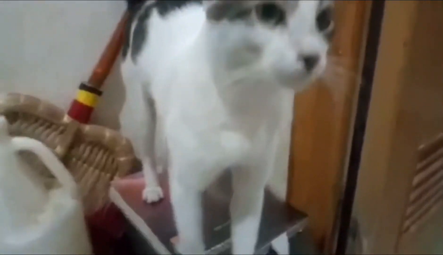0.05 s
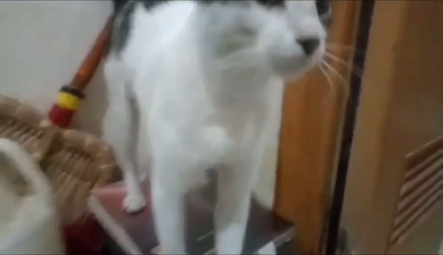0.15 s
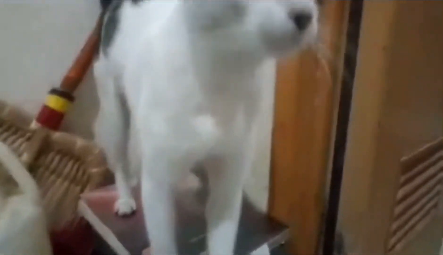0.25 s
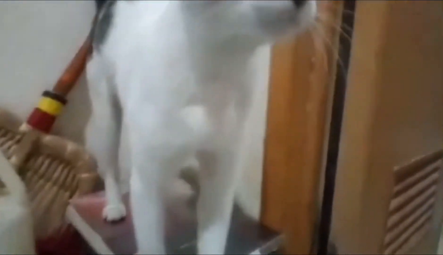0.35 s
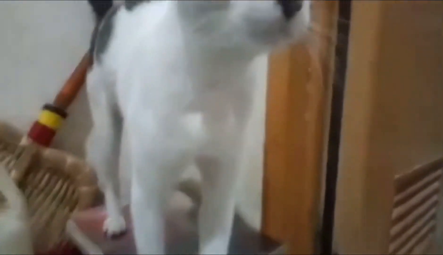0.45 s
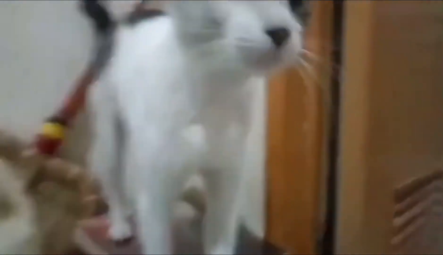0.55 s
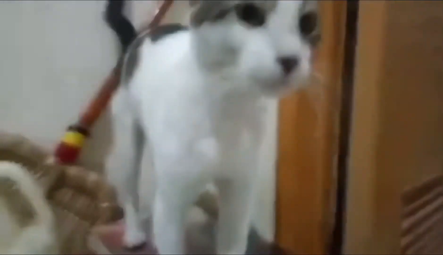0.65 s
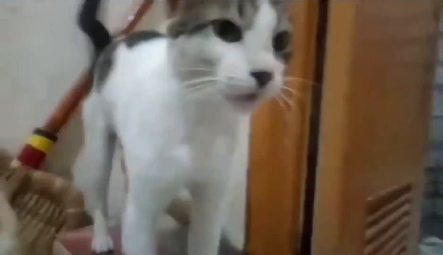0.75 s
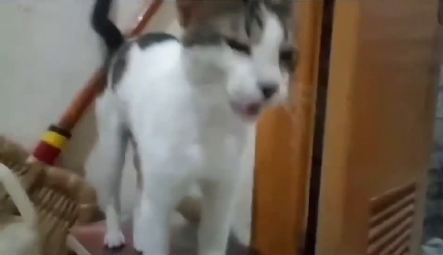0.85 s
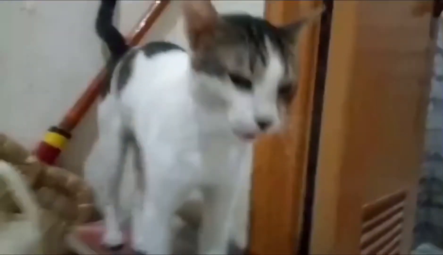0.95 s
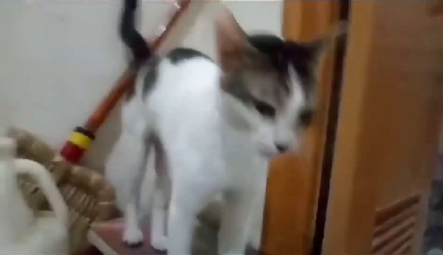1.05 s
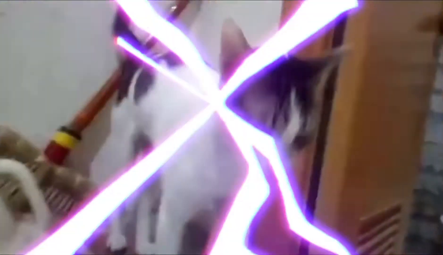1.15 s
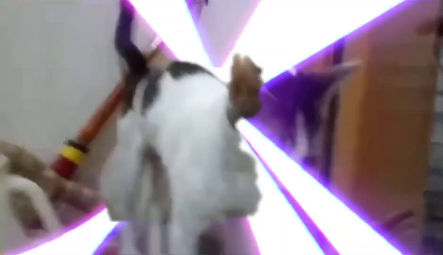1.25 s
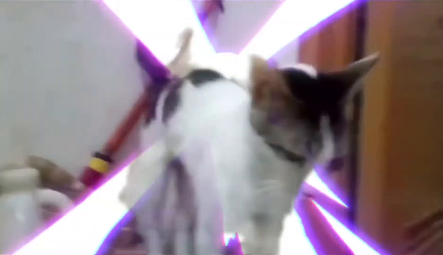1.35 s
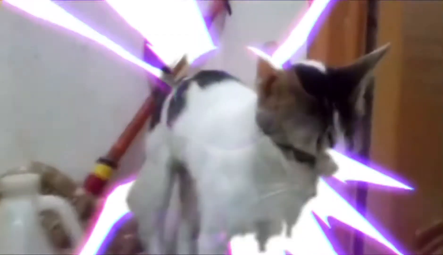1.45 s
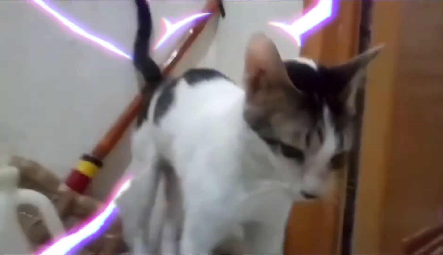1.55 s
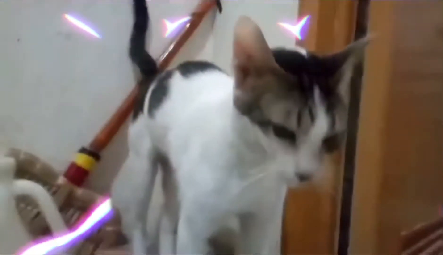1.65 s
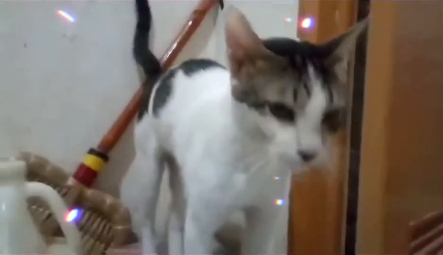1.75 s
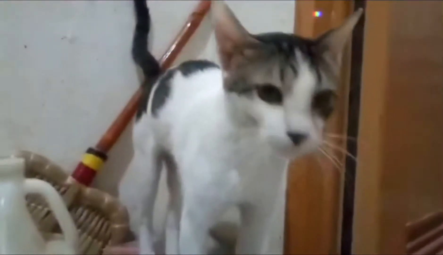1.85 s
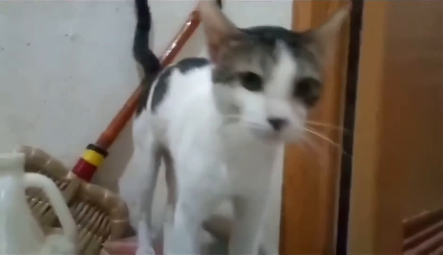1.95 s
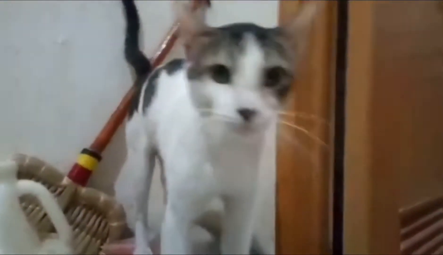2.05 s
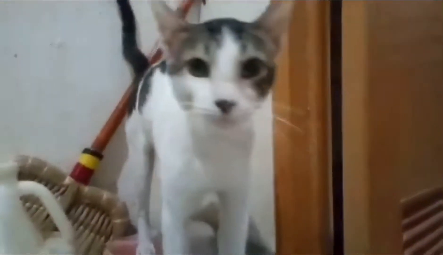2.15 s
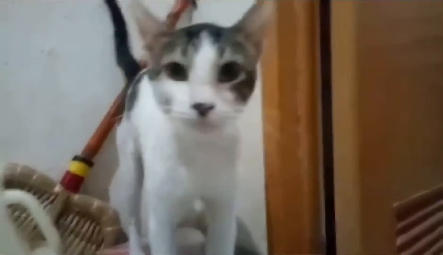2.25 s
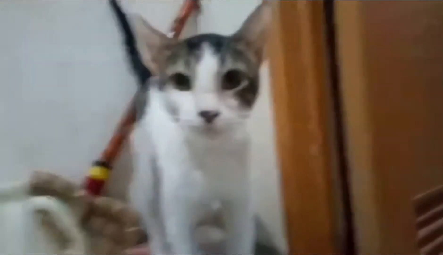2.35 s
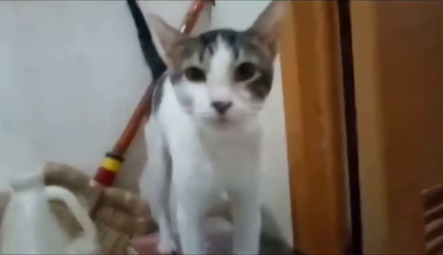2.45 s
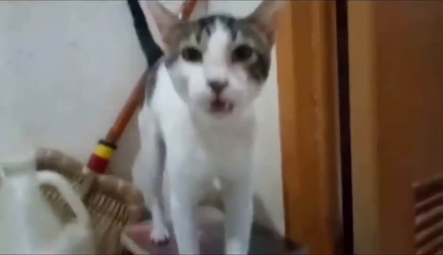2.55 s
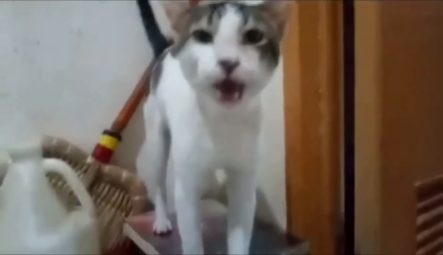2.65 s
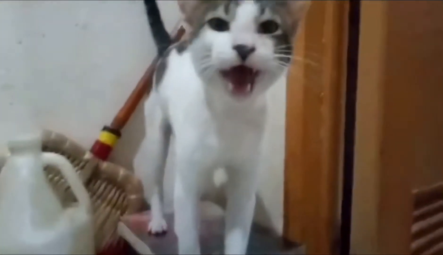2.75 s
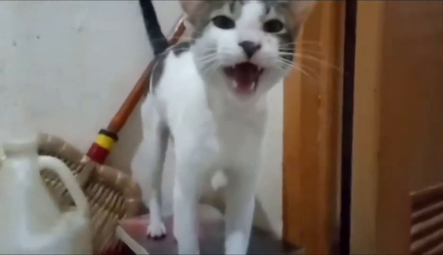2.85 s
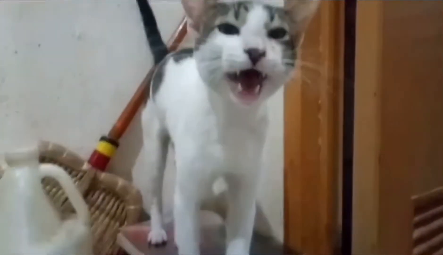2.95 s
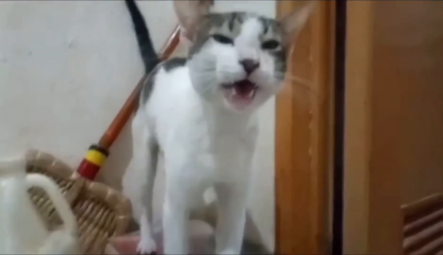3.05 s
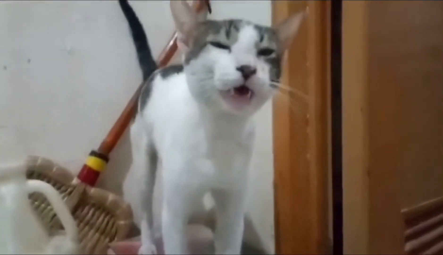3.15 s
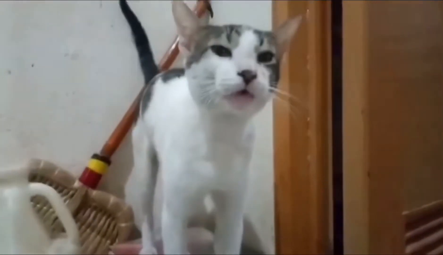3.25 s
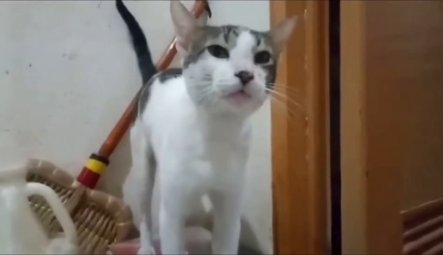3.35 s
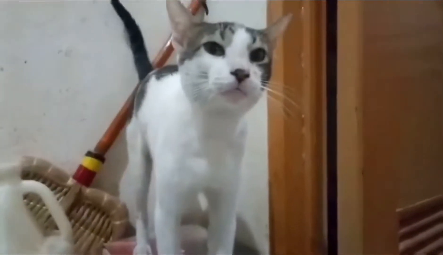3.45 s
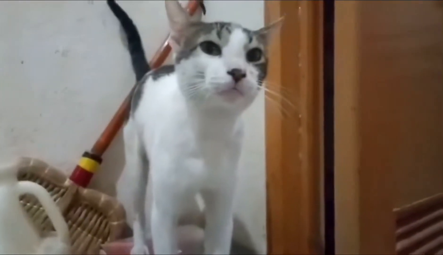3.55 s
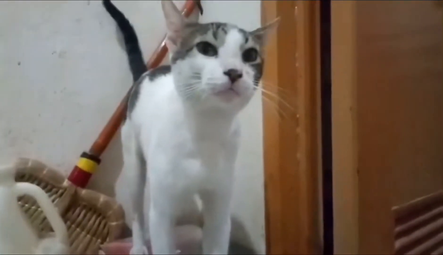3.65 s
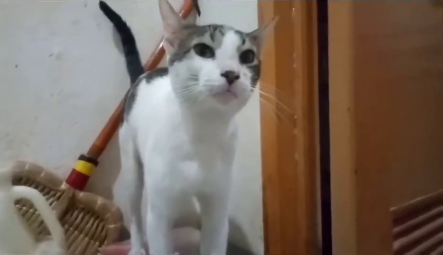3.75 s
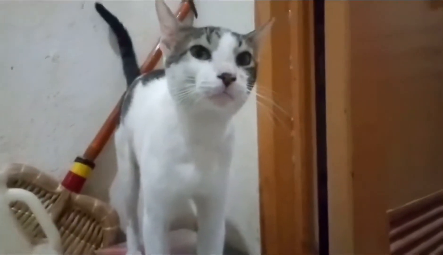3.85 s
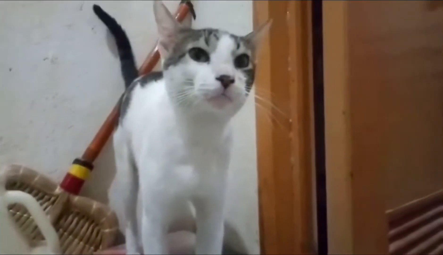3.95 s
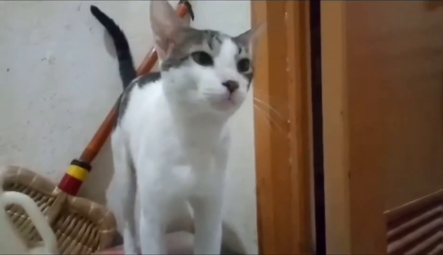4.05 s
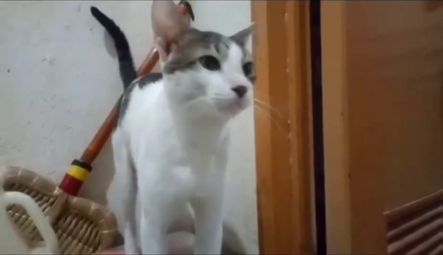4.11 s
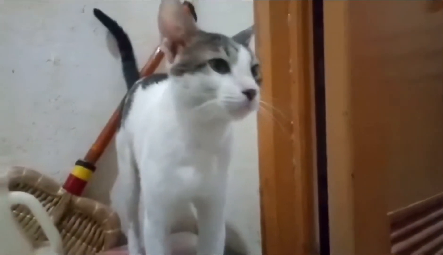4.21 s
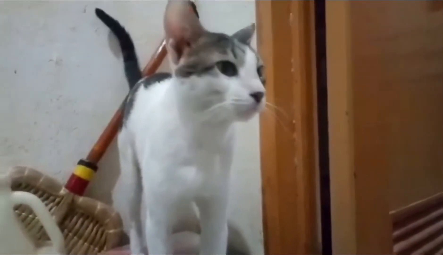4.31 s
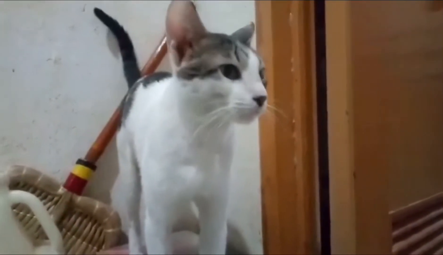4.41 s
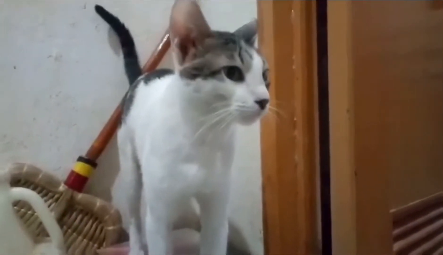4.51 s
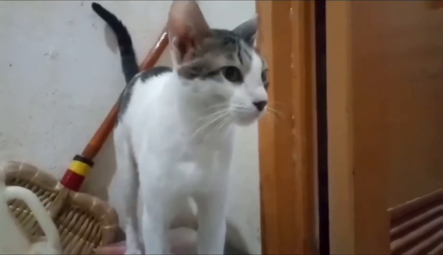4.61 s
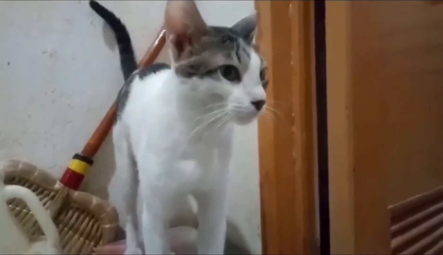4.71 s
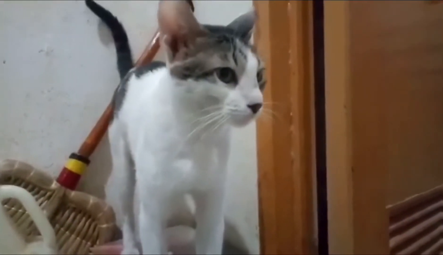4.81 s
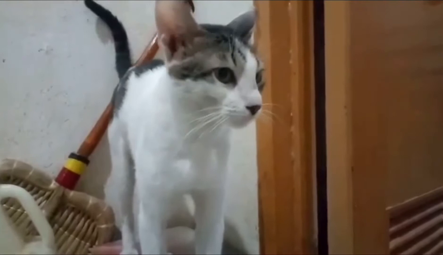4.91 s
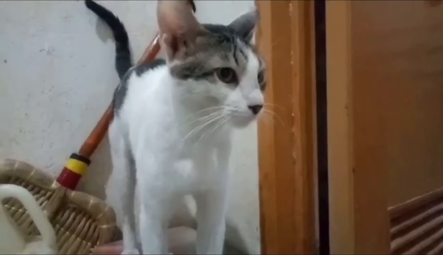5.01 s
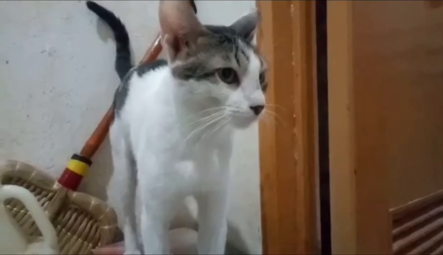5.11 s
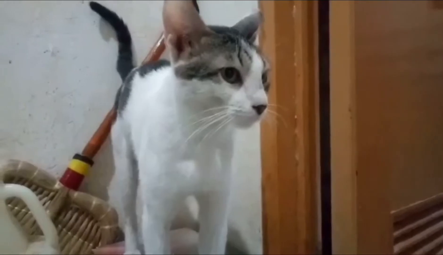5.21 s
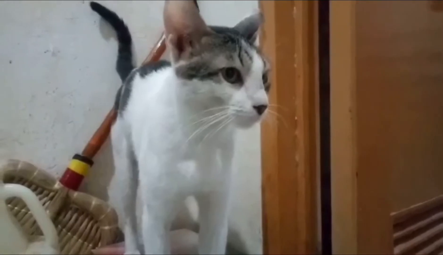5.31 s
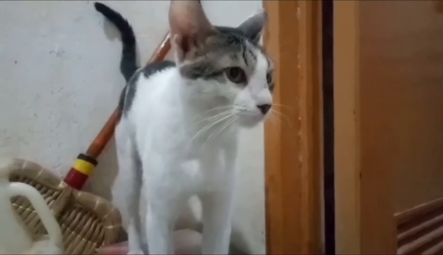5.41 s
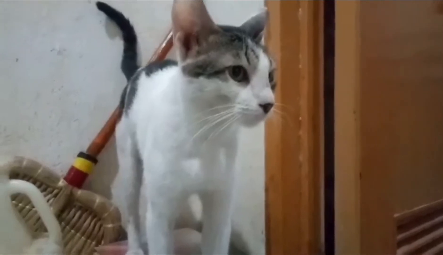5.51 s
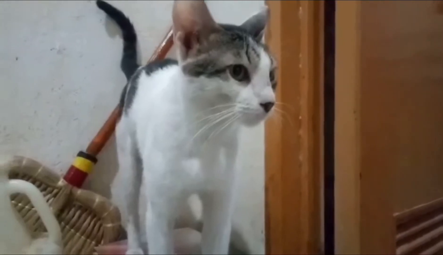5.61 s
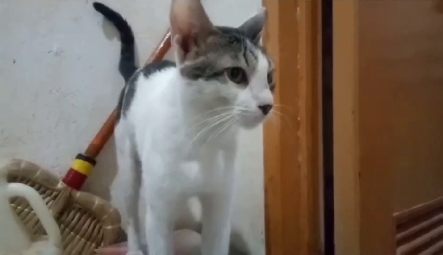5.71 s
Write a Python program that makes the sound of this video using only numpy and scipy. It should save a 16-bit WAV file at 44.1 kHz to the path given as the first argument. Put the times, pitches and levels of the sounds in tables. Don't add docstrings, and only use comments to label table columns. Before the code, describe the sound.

Faint air noise, fridge hum and a wavering low rumble open the scene. A nearby cat gives a brief trilled meow with a breathy end, pauses, then a longer, stronger one. Bristly scrapes with hollow knocking resonance follow from next door, in two clusters. Phone pickup, short dense indoor echo, left side louder.

```python
import sys
import numpy as np
from scipy import signal
from scipy.fft import rfft, irfft
from scipy.io import wavfile
from scipy.ndimage import uniform_filter1d, minimum_filter1d

SR = 44100
rng = np.random.default_rng(int(sys.argv[2]) if len(sys.argv) > 2 else 0)


def generate_wav(signal):
    frames = np.transpose(np.atleast_2d(signal))
    scaled = np.clip(frames, -1, 1) * 32767
    pcm = np.round(scaled).astype(np.int16)
    wavfile.write(sys.argv[1], SR, pcm)


def invert_db(x):
    u = np.asarray(x, float) / 20
    return 10 ** u


N = 254436
T = np.arange(N) / SR
HZ = np.fft.rfftfreq(N, 1 / SR)


def meow(cry, hoarse):
    trill_crests = [
        .522,
        0.714,
        0.953,
        1.239,
        2.322,
        2.611,
        2.847,
        3.097,
        3.2,
        3.393,
    ]
    beat_counts = [6, 5, 8, 30, 8, 4, 6, 3, 4]
    # jaw opening/0-1, nose level/dB, throat level/dB, mouth level/dB, palate level/dB
    jaw_levels = [(0, 1.5, -16.5, -19, -32.5), (.33, -9.5, 3, -20, -16), (.52, -22.5, -5, -8, -5),
                  (.7, -36, -13, -3, -4.5), (1, -29.5, -17.5, -10, 0)]
    jaw_shapes = [(0, 780, 8.2, 0.5, .55), (.33, 1152, 6.9, -26, 0.39), (.52, 1280, 6.43, -15.5, 0.14),
                  (.7, 1070, 6.97, -20, 0.01), (1, 1103, 6.754, 1.5, .001)]
    # f/Hz, width/Hz, level under the palate/dB
    sinus_rings = [(5200, 900, -22), (6000, 500, -25), (7400, 900, -31), (9800, 1500, -41),
                   (12000, 1500, -54)]
    nose_hz, nose_width_hz, throat_width_hz = 468, 320, 420
    mouth_order, mouth_width_hz = 4.0, 284
    palate_width_hz, palate_roof_hz = 520, 4250
    palate_drop_per_trill = 0.95
    cheek_hz, cheek_width_hz = 2930, 260
    breath_db, breath_hz, breath_width_hz = -2, 4400, 2100
    head_turn_db, right_lead_s = -2.5, .000045

    start_s, end_s = cry[0][0], cry[-1][0]
    on = (T > start_s) & (T < end_s)
    hz, effort_db, jaw, depth = columns_at(cry, T[on])
    nose, throat, mouth, palate = (invert_db(effort_db + db) for db in columns_at(jaw_levels, jaw))
    throat_hz, palate_partial, cheek_db, rough = columns_at(jaw_shapes, jaw)
    palate_hz = (palate_partial - palate_drop_per_trill * depth) * hz
    rough = np.clip(rough + hoarse * depth * np.linspace(0, 1, len(jaw)) ** 2, 0, 1)
    trill = np.cos(2 * np.pi * np.interp(T[on], trill_crests, np.cumsum([0, *beat_counts])))

    hz = uniform_filter1d(hz, size=2600)
    arch = .015 + .13 * np.clip((505 - hz) / 50, 0, 1)
    hz = hz * (1 + arch * depth * trill + 0.048 * rough * walk(160)[on] + 0.001908 * walk(30)[on])
    phase = 2 * np.pi * np.cumsum(hz) / SR
    smooth_hz = uniform_filter1d(hz, size=400)
    palate_db = 20 * np.log10(palate)

    out = np.zeros((2, N))
    for k in range(1, 25):
        f = k * smooth_hz
        gain = nose * bell(f, nose_hz, nose_width_hz)
        gain += throat * bell(f, throat_hz, throat_width_hz)
        gain += mouth * bell(f, mouth_order * smooth_hz, mouth_width_hz)
        roof = bell(np.maximum(f, palate_roof_hz), palate_roof_hz, 1000)
        gain += palate * bell(f, palate_hz, palate_width_hz) * roof
        gain += sum(invert_db(0.8 * palate_db - 3.5 + db) * bell(f, c, w) for c, w, db in sinus_rings)
        gain += mouth * invert_db(cheek_db) * bell(f, cheek_hz, cheek_width_hz)
        gain *= invert_db(1.5 * walk(18)[on])
        share = np.clip(rough * (.5 + 0.12 * k), 0, 1)
        breath_band = (walk(350)[on] + 1j * walk(350)[on]) * (0.9 + 1.04 * share)
        fray = np.sqrt(1 - share) + np.sqrt(share / 2) * breath_band
        line = gain * fray * np.exp(1j * (k * phase + k * k * 0.4 - 1.6))
        turn = invert_db(head_turn_db * np.clip(1.2 + f / 5000, 0, 1) / 2)
        out[0, on] += turn * line.imag
        out[1, on] += (line * np.exp(2j * np.pi * f * right_lead_s)).imag / turn
    leak = diffuse(bell(HZ, breath_hz, breath_width_hz) ** 2)[:, on]
    out[:, on] += leak * palate * invert_db(breath_db) * rough
    out[:, on] *= (1 + np.clip(depth, 0, 1) * trill) / np.sqrt(1 + depth ** 2 / 2)
    fade = np.clip(np.minimum(T - start_s, end_s - T) / 0.0031, 0, 1)
    return 1.07 * out * fade


def rasp():
    # peak t/s, level/dB, rise/(dB/s), fall/(dB/s)
    puffs = [
        (1.312, -28, 20, 74.5),
        (3.268, -32.5, 94.5, 87),
        (3.422, -36.5, 93, 397),
    ]
    # f/Hz, level/dB per Hz
    air_colour = [(120, -50.5), (200, -3), (369, 4), (622, 7), (679, -6.5), (741, 7.5), (2840, 4.5),
                  (4250, -1.5), (7050, -21), (7830, -28), (13000, -36)]
    colour = invert_db(over_hz(air_colour))
    thin_colour = colour * bell(HZ, 3310, 5100) * (1 - bell(HZ, 0, 2200))
    airs = (diffuse(colour), diffuse(thin_colour))
    nose = diffuse(bell(HZ, 6600, 3200) ** 2 + 0.029 * (HZ > 9000))
    nose = nose * invert_db(3.4 * walk(70)) * swell(*puffs[-1])
    flutter = 1.6 * invert_db(0.77 * walk(60))
    hoarse_air = 0
    for air, puff in zip(airs, puffs):
        onset = np.clip((T - puff[0] + 0.17) / 0.08, 0, 1)
        hoarse_air = hoarse_air + air * swell(*puff) * onset
    return nose + flutter * hoarse_air


def walls(x):
    t60_s, echo_db = 0.17, -6.5
    t = T[:SR // 3]
    tail = rng.standard_normal((2, len(t))) * 1000 ** (-t / t60_s) * (t > .003)
    tail /= np.sqrt(np.sum(tail ** 2, axis=1, keepdims=True))
    return invert_db(echo_db) * signal.fftconvolve(x, tail, axes=1)[:, :N]


def scuffs():
    # peak t/s, rise/(dB/s), deep ring level/dB, high ring level/dB, bristle hiss level/dB
    rubs = [(3.447, 150, -32.5, -44.5, -48), (3.672, 155, -33.5, -37, -47.5), (3.848, 302, -23, -31, -40.5),
            (3.898, 200, -59, -35, -41.5), (4.066, 149, -35.5, -43, -60), (4.751, 166, -40, -43, -39.5),
            (4.813, 134, -37, -30.5, -37), (4.943, 900, -24, -27.5, -35), (5.172, 168, -50, -41.5, -33.5),
            (5.273, 600, -36, -43, -53), (5.35, 102, -44, -40.5, -49), (5.524, 156, -37.5, -33, -35),
            (5.716, 356, -34, -41.5, -43), (5.76, 115, -43, -40.5, -56)]
    # f/Hz, width/Hz, level/dB
    vessel_modes = [(321.6, 55, 2), (369, 18, -8), (443.3, 23, -0.5), (511.5, 17.5, -1), (558, 83, -5.5),
                    (670, 25, 1.5), (752, 37, -10.5), (802, 38, -1.5), (868.5, 26, -1.5), (1053, 23, -4.5)]
    # f/Hz, level/dB per Hz
    bristle_colour = [(880, -35), (1500, -10.5), (1980, 2), (2340, 2), (4240, 2), (4900, -4), (6030, -24.5),
                      (7100, -12.5), (13000, -76)]
    ring_fall, hiss_fall, middle_db = 154, 140, -1.5
    modes = sum(invert_db(db) * bell(HZ, f, w) for f, w, db in vessel_modes)
    grip = invert_db(0.92 * walk(40))
    deep_ring = 0.86 * diffuse(modes * (HZ < 555)) * grip
    high_ring = 0.86 * diffuse(modes * (HZ > 555)) * grip
    middle = 0.81 * diffuse(bell(HZ, 1260, 650)) * grip
    bristle = 1.01 * diffuse(invert_db(over_hz(bristle_colour)) * (HZ > 1500)) * invert_db(0.81 * walk(90))
    out = np.zeros((2, N))
    for s, rise, deep_db, high_db, hiss_db in rubs:
        out += swell(s, deep_db, rise, ring_fall) * deep_ring
        out += swell(s, high_db, rise, ring_fall) * high_ring
        out += swell(s, (high_db + hiss_db) / 2 + middle_db, rise, hiss_fall) * middle
        out += swell(s, hiss_db, rise, hiss_fall) * bristle
    return out


def room_tone():
    # f/Hz, level/dB per Hz
    air_colour = [(15, -43), (25, -15.5), (114, -1.5), (173, -11.5), (293, -10.5), (361, -5.5), (534, -17),
                  (641, -10), (878, -13), (1080, -15), (1300, -17.5), (2140, -18), (4330, -16),
                  (5930, -32.5), (13000, -47.5)]
    # f/Hz, width/Hz, level/dB
    fridge_lines = [(120.1, 2.5, -49), (359, 5.5, -56), (204, 43, -58.5)]
    # peak t/s, level/dB
    rumbles = [
        (.05, -46.5),
        (.21, -43.5),
        (.45, -51),
        (.68, -39),
        (2.06, -49),
        (2.4, -52),
        (3.92, -48),
        (4.92, -43.5),
        (5.43, -47),
        (5.77, -46),
    ]
    # start t/s, end t/s, first dip level/dB, last dip level/dB
    ducks = [
        (0.706, 1.153, -11, -10),
        (2.5, 3.205, -16.5, -18),
    ]
    rest_db, attack_s, release_s = 3.5, 0.1, 0.078
    hum_share, rumble_share = 1.26, .7
    air = diffuse(invert_db(over_hz(air_colour))) * invert_db(-46) * invert_db(walk(4.06) / 2)
    hum = sum(invert_db(db) * diffuse(bell(HZ, f, w)) for f, w, db in fridge_lines)
    swells = invert_db(-69.5) + sum(swell(s, db, 75, 75) for s, db in rumbles)
    duck_db = np.zeros(N)
    for a, b, first, last in ducks:
        duck_db += np.interp(T, [a, a + attack_s, b, b + release_s], [0, first, last, 0])
    rumble = diffuse(bell(HZ, 67, 37)) * swells * invert_db(rumble_share * duck_db)
    return (air + hum * invert_db((hum_share - 1) * duck_db)) * invert_db(rest_db + duck_db) + rumble


def columns_at(table, at):
    key, *columns = np.transpose(table)
    return [np.interp(at, key, c) for c in columns]


def over_hz(points):
    hz, value = np.transpose(points)
    return np.interp(np.log(HZ + 1), np.log(hz), value)


def unit(x):
    return x / np.sqrt(np.mean(x ** 2))


def walk(rate):
    k = int(SR / rate)
    held = np.repeat(rng.standard_normal(N // k + 1), k)
    return unit(uniform_filter1d(uniform_filter1d(held, k), k)[:N])


def diffuse(gain):
    # f/Hz, likeness/0-1
    port_likeness = [(60, 0.84), (280, 0.95), (600, 0.55), (1200, 0), (13000, 0.26)]
    alike = np.clip(over_hz(port_likeness), 0, 1)
    mid, side = rfft(rng.standard_normal((2, N))) * gain * np.sqrt([1 + alike, 1 - alike])
    return unit(irfft([mid + side, mid - side], N))


def bell(hz, centre_hz, width_hz):
    return 1 / (1 + (2 * (hz - centre_hz) / width_hz) ** 2)


def swell(peak_s, db, rise_db_s, fall_db_s):
    return invert_db(db - np.where(T < peak_s, rise_db_s * (peak_s - T), fall_db_s * (T - peak_s)))


def scene():
    # t/s, pitch f/Hz, effort level/dB, jaw opening/0-1, trill depth/0-1
    cries = [
        [(.5, 345, -31.5, 0.12, 0.6), (.6, 420, -28, 0.15, 0.28), (.69, 449.2, -25, 0.31, 0.41),
         (.73, 484.7, -19.5, 0.58, 0.14), (.795, 530, -17.5, 0.57, 0.13), (.885, 533.6, -15.5, 1.0, 0.02),
         (.95, 537.4, -16, 0.73, 0.22), (1.16, 530.4, -23, 0.42, 0.35), (1.235, 516, -42, 0.1, .4)],
        [(2.3, 406.6, -37.5, .05, 0.84), (2.44, 449.1, -25.5, 0.29, 0.48), (2.52, 489, -17.5, 0.54, 0.03),
         (2.6, 542.8, -20, 0.67, 0.25), (2.72, 568, -14.5, 1, 0), (2.95, 552.5, -15.5, 0.98, 0.12),
         (3.14, 525, -18.5, 0.67, 0.61), (3.27, 505, -23, 0.39, 0.39), (3.42, 497, -47, 0.33, 0.13)],
    ]
    hoarse_ends = [
        .9,
        .18,
    ]
    cat = sum(meow(cry, hoarse) for cry, hoarse in zip(cries, hoarse_ends))
    return cat + walls(cat) + rasp() + scuffs() + room_tone()


def thin_treble(x):
    from_hz, drop_db, slope_db_khz, spread_db, patchy_db = 4400, -21, -1.3, 9, 1
    hz, _, z = signal.stft(x, SR, nperseg=1024)
    power = uniform_filter1d(np.abs(z) ** 2, size=5, axis=1)
    mean_power = uniform_filter1d(power[:, hz > 1000].mean(axis=1, keepdims=True), size=3, axis=2)
    chance = uniform_filter1d(rng.standard_normal(z[:1].shape), size=11, axis=1)
    chance = uniform_filter1d(chance, size=4, axis=2)
    limit_db = drop_db + slope_db_khz * (hz[:, None] - from_hz) / 1000 + spread_db * unit(chance)
    keep = (power > mean_power * invert_db(2 * limit_db)) | (hz[:, None] < from_hz)
    patches = np.where(keep, invert_db(patchy_db * unit(chance[:, ::-1])), .02)
    return signal.istft(z * patches, SR, nperseg=1024)[1][:, :N]


def limiter(x):
    room = np.minimum(1.0 / (np.abs(x) + 1e-9), 1)
    return x * uniform_filter1d(minimum_filter1d(room, size=441), size=441)


def low_pass(x):
    return signal.sosfilt(signal.butter(12, 13180, fs=SR, output="sos"), x)


def record(dry):
    # f/Hz, left minus right level/dB
    port_balance = [(60, 4), (200, 8), (650, 6.5), (1170, 9), (2120, 11), (3840, 17), (5000, 14.5),
                    (6950, -1), (9500, 10), (11000, 6.5), (13000, 21)]
    flip_times = [
        2.8905,
        2.9305,
    ]
    ports = invert_db(over_hz(port_balance) / 2)
    low_cut = 1 - bell(HZ, 0, 70)
    notch = 1 - 0.48 * bell(HZ, 8380, 570)
    spectrum = rfft(dry) * low_cut * notch * [ports, 1 / ports] * (HZ < 13180)
    x = irfft(spectrum, N)
    in_band = (HZ > 1950) & (HZ < 3650)
    turned = irfft(spectrum[0] * in_band, N) * ((T > flip_times[0]) & (T < flip_times[1]))
    x[0] -= 2 * irfft(rfft(turned) * in_band, N)
    mix = limiter(thin_treble(x))
    return low_pass(mix)


dry = scene()
out = record(dry)
generate_wav(out)
```